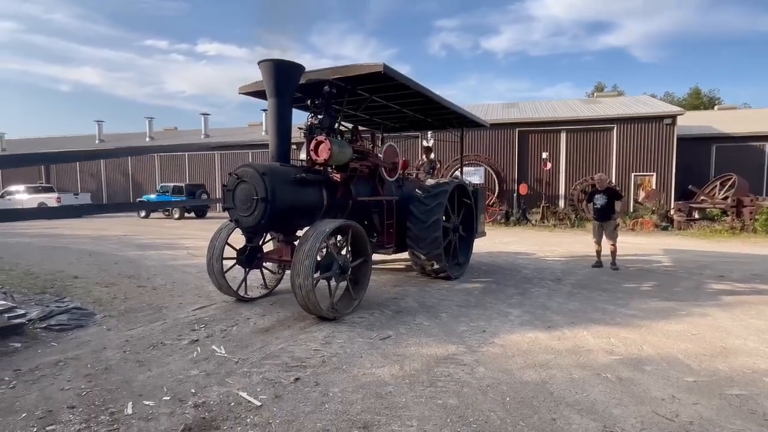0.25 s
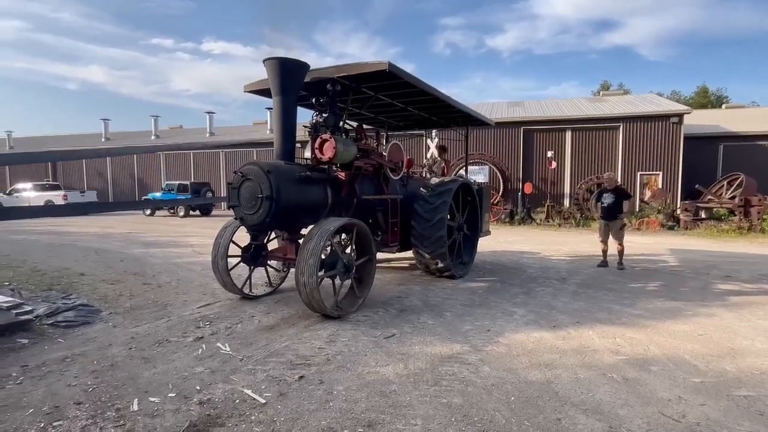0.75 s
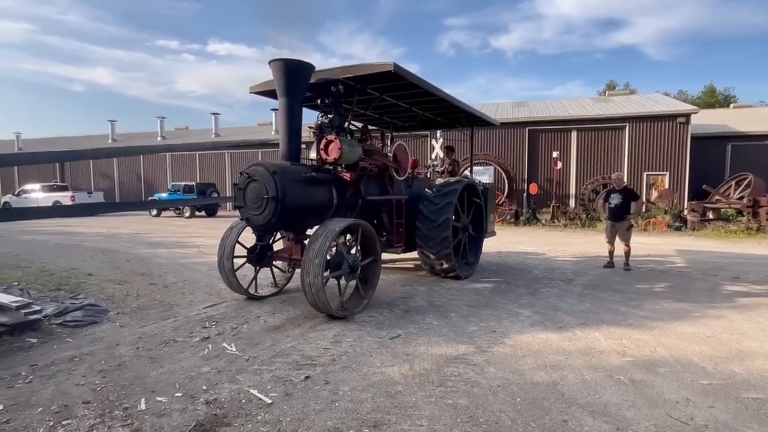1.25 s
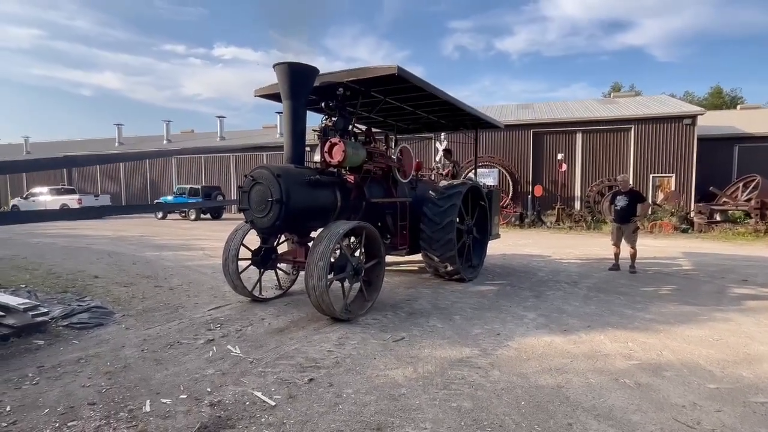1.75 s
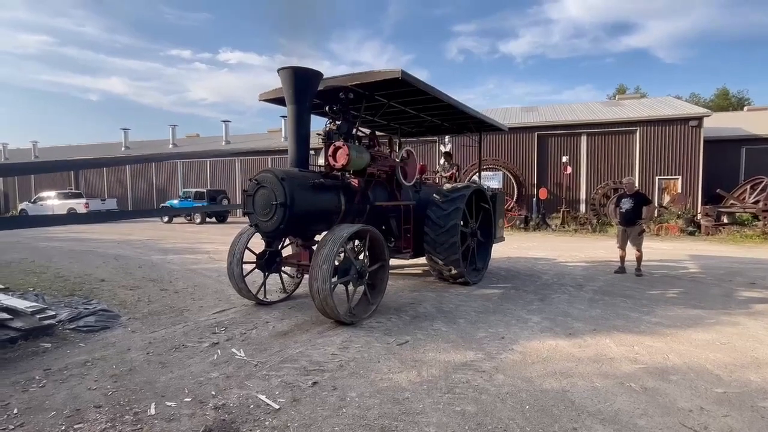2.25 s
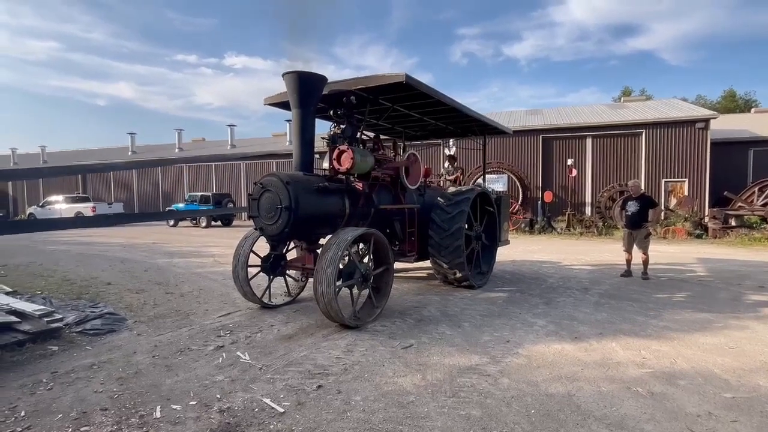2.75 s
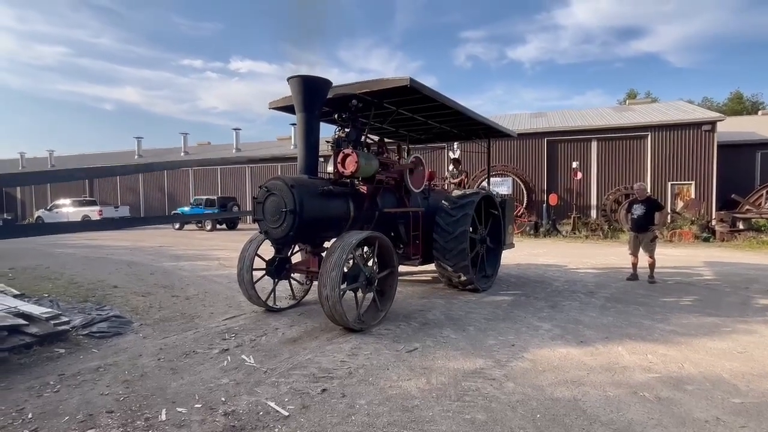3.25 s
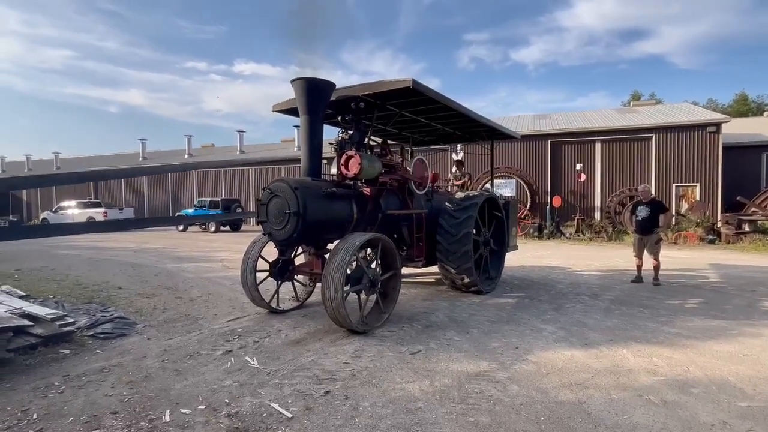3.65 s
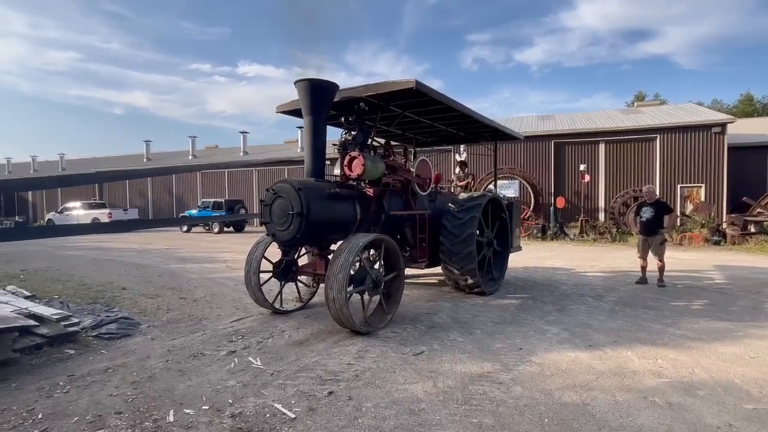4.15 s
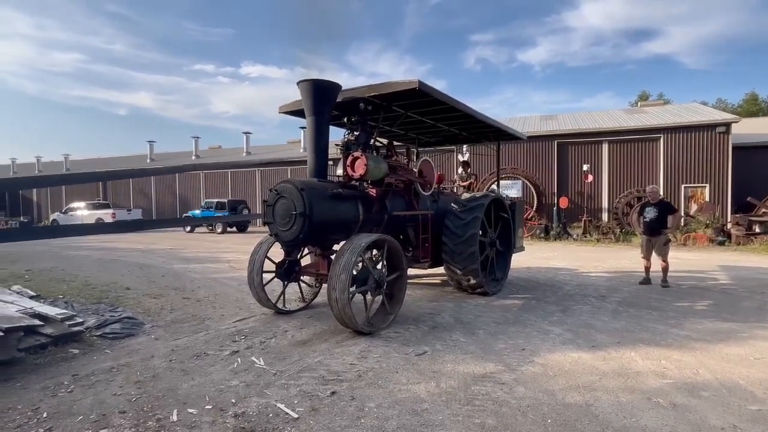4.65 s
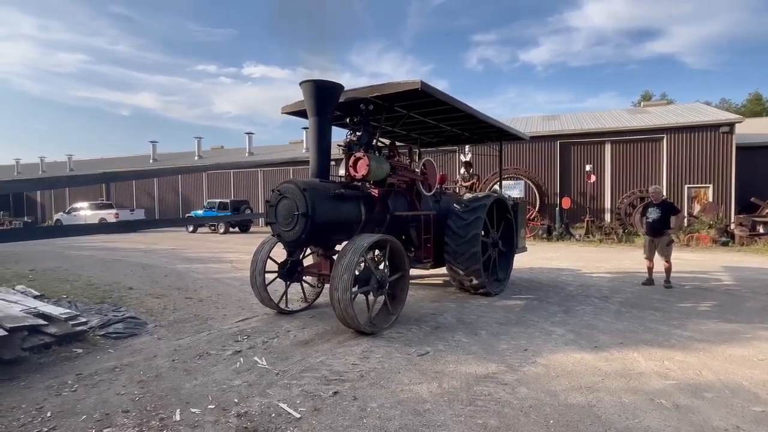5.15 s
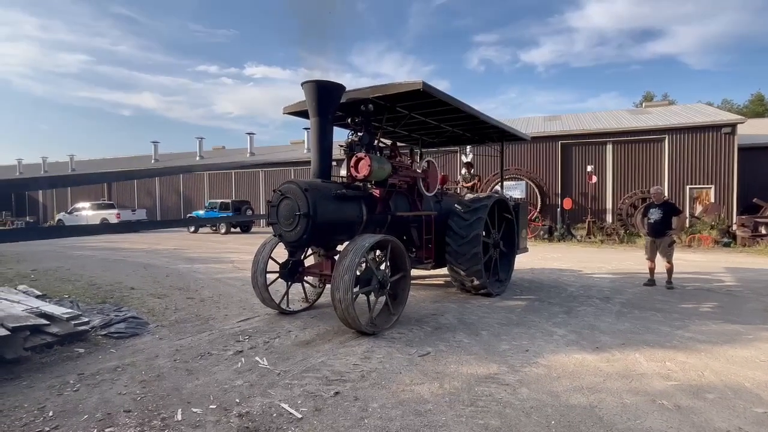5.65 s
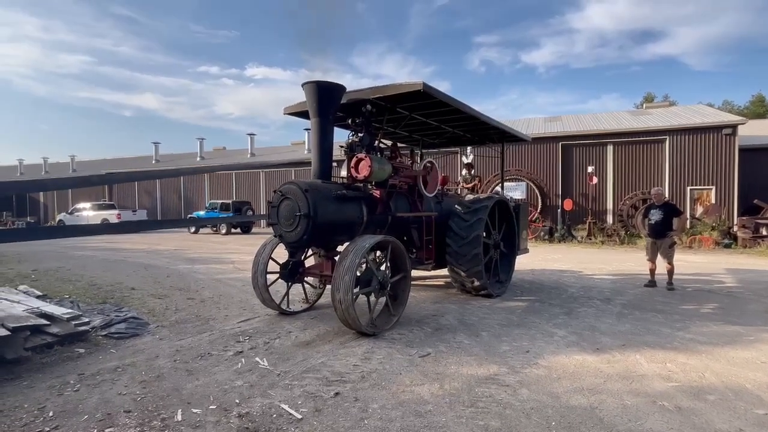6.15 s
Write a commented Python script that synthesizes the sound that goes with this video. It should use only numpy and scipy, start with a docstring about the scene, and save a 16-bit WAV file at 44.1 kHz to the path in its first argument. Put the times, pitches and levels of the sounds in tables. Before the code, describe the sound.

In an open gravel yard beside long sheds, a steam traction engine works under constant load. Quick, hollow chuffs bark from its chimney about eight times a second, each with a low thump, breathy roar and hiss. Softer puffs fall after every second beat. Fine metallic pings and rod clatter run underneath, with a continuous low fan rumble and faint steam leak. Stereo microphone at moderate distance, short shed reflections.

```python
"""Steam traction engine in a walled yard

The engine works under steady load. Twice a turn the exhaust blows up the chimney: a push rings the air in
smokebox and chimney as decaying modes, and a jet of shaped noise barks in the pipe, roars, hisses and spits.
A weaker puff of noise follows every second beat. The valve gear pings and the rods clatter as short sines,
over a grain of small pings; the driven fan and leaking steam rush on as noise without pause, and the sheds
answer with a noise tail."""
import sys
import numpy as np
from scipy import signal
from scipy.fft import rfft, irfft, next_fast_len
from scipy.io import wavfile
from scipy.ndimage import uniform_filter1d

SR = 44100
rng = np.random.default_rng(int(sys.argv[2]) if len(sys.argv) > 2 else 0)


def int16_out(signal):
    """Quantize to a 16-bit WAV file."""
    q = np.round(np.clip(np.atleast_2d(signal).T, -1, 1) * 32767)
    wavfile.write(sys.argv[1], SR, q.astype(np.int16))


N = 283122

# Exhaust beats: t/s, bark/dB, bark tilt/dB per octave, thump/dB, roar/dB
EXHAUST_BEATS = [(0.0528, -17, -6, -22, -23.5), (0.1896, -20, 28.5, -20, -26),
                 (0.3114, -12.5, -10, -24, -23.5), (0.4501, -16, -4, -15.5, -24),
                 (0.574, -15.5, 6, -18, -25), (0.7132, -22, 15, -15, -23), (0.837, -14.5, -12, -19, -22.0),
                 (0.9756, -12.5, 7.5, -16.5, -24.5), (1.098, -15.5, 9, -15, -25),
                 (1.2391, -16.5, 14.5, -17.5, -23.5), (1.361, -14, -12, -20, -26.5),
                 (1.5, -15.5, -6.5, -18, -25.5), (1.621, -15, 10, -17, -23), (1.764, -17, -4, -20, -26),
                 (1.8879, -16, -17, -18.5, -23), (2.0265, -15.5, -19, -15.5, -25.5),
                 (2.1505, -14.5, 13, -19.5, -25), (2.2886, -12.5, 2, -19, -23),
                 (2.4078, -15, -16, -20.5, -22.5), (2.549, -16, 5, -16, -24),
                 (2.675, -15.5, -9, -19, -24.0), (2.812, -18.5, -12, -16.5, -24.5),
                 (2.9341, -14.5, 1, -15.5, -23.5), (3.073, -17, 16, -21, -24.5),
                 (3.1971, -12.5, -5, -21, -25.5), (3.3325, -13, -1.5, -15, -26),
                 (3.4576, -21.5, -13, -19, -26), (3.597, -13.5, 8, -23, -22.5), (3.72, -16.5, 11, -20, -28),
                 (3.8575, -12.5, 1, -23.5, -24.5), (3.9823, -14.5, -20, -21, -24.5),
                 (4.1169, -20, 4, -15.5, -24), (4.2398, -16, -13, -16, -26.5),
                 (4.3796, -13, -3, -19, -23.5), (4.502, -21.5, 12, -16.5, -25.5),
                 (4.6408, -18, -8, -15, -23.5), (4.7634, -17, 10, -32, -24.5),
                 (4.9029, -17.5, 12, -19, -22.5), (5.026, -17, 14, -13.5, -23.5),
                 (5.1615, -13.5, -7, -21.5, -24), (5.284, -15, -13, -19, -24.0),
                 (5.422, -16.5, -20, -28, -25.0), (5.546, -17.5, -10, -21, -27.5),
                 (5.6832, -14.5, -8, -15, -24.0), (5.8006, -15.5, -2, -23, -26.5),
                 (5.9415, -14.5, -2, -25, -24), (6.06, -12, -5, -21.5, -23.5), (6.197, -18, -4, -27, -25.5),
                 (6.3221, -16.5, -3, -17.5, -24)]
# How long after its start each beat's bark swings widest: t/s
BARK_CRESTS = [0.0048, 0.006, 0.0071, -0.0018, 0.0039, 0.0038, 0.0099, 0.007, 0.0077, 0.0003, 0.015, 0.0042,
               0.0135, 0.013, 0.022, 0.0091, 0.013, 0.016, 0.021, 0.0069, 0.026, -0.00076, 0.011, 0.01,
               0.0055, 0.014, 0.0079, 0.0155, 0.0042, 0.0108, 0.0054, 0.017, 0.0187, 0.0118, 0.0149,
               -0.0049, 0.0135, -0.0011, 0.0036, 0.0007, 0.02, 0.0082, 0.005, 0.0225, 0.0233, 0.0045, 0.015,
               0.006, 0.016]
# The two ends of the cylinder take turns: swell stretch/factor, hiss/dB before scatter and sag
CYLINDER_ENDS = [(1.07, -35), (1.07, -33.5)]
# The weaker puff after every second beat: t/s, roar/dB, thud/dB
LATE_PUFFS = [(0.236, -32.5, -29), (0.498, -29, -28.8), (0.761, -31, -25), (1.018, -32, -34),
              (1.286, -30, -23), (1.561, -30, -31), (1.812, -29.5, -24), (2.071, -30, -32),
              (2.342, -29.5, -21.5), (2.599, -29, -30), (2.856, -29.5, -37), (3.125, -30, -22.5),
              (3.382, -29, -25), (3.646, -29.0, -26.5), (3.906, -29, -34), (4.165, -29.8, -32),
              (4.426, -32, -29.2), (4.69, -28.5, -29.0), (4.951, -30, -30), (5.21, -29, -27),
              (5.473, -29, -38), (5.731, -31.1, -26.8), (5.989, -29.5, -33), (6.25, -29, -27)]

# Air modes of the smokebox, rung by the push: f/Hz, level/dB, swell/s, phase scatter/rad
SMOKEBOX_MODES = [(59.9, -15, 0.037, 0.22), (68.6, -8, 0.013, 0.17), (84, 0, 0.011, 0.25),
                  (100, -10, 0.015, 0.54)]
# Air modes of the chimney, rung by the push: f/Hz, level/dB, swell/s, phase scatter/rad
CHIMNEY_MODES = [(172.2, 0.5, 0.021, 0.74), (200.2, -0.5, 0.016, 0.55), (252.8, -0.5, 0.018, 0.56),
                 (362.7, -11, 0.019, 0.68), (434, -25.5, 0.032, 1.5)]
# Low pipe resonances under the jet: f/Hz, width/Hz, relative level/dB
PIPE_RESONANCES = [(175, 61.6, 1), (276.4, 40.3, 1.5), (355, 45.2, -6), (414.4, 99.3, -7)]
# Upper resonances that colour the roar: f/Hz, width/Hz, relative level/dB
ROAR_RESONANCES = [(582, 82, -5), (688.3, 46, 4.5), (853, 76, 0), (1007, 62, 0.5), (1157, 86, 0.5),
                   (1364, 45, 2.5), (1520, 144, -1.5), (1730, 157, -2.5), (1892, 276, -7)]

# Colour of the hissing jet: f/Hz, relative level/dB per Hz
HISS_COLOUR = [(1500, -45), (2000, -8), (2400, 7.5), (3100, 6.5), (3600, 4), (4500, 5), (5300, 3),
               (6500, -3), (8000, -9), (11500, -37)]
# Colour of the wet crack at the nozzle: f/Hz, relative level/dB per Hz
SPIT_COLOUR = [(4500, -30), (6500, 6), (8500, -1), (11200, -2), (11700, -30)]
# Random patches of gain in the noise, none in the bass, even above 1500 Hz: f/Hz, depth/dB
PATCH_DEPTH = [(150, 0), (600, 2.6), (1500, 3), (2500, 3), (9000, 3)]

# The clearest pings of the valve gear: t/s, f/Hz, level/dB
CLEAR_PINGS = [(.418, 5920, -29), (.621, 5900, -29), (.679, 5840, -30), (.765, 3420, -25),
               (.918, 3090, -21.5), (1.155, 5900, -28), (1.371, 3160, -24.5), (2.554, 5070, -32),
               (3.86, 5530, -31), (4.011, 4400, -37), (4.640, 2160, -21), (6.171, 3200, -32)]

# Colour of the steady rush: f/Hz, relative level/dB per Hz
RUSH_COLOUR = [(22, -14.5), (36, -13.5), (46, -7), (58, 0.5), (75, -5.5), (95, -5), (130, -8.5),
               (260, -8.5), (500, -22.5), (750, -26), (1000, -27.5), (1600, -27), (2000, -31.5),
               (2300, -36.5), (2700, -34), (3200, -37.5), (4500, -36), (5300, -42), (6600, -42),
               (7600, -52.5), (11700, -77)]
# Loudness of the rush over time: t/s, level/dB
RUSH_LEVEL = [(0, -20.5), (1.6, -22.5), (3.2, -22.5), (4.8, -22.5), (6.42, -22.5)]
# Colour of a thin leak of steam: f/Hz, relative level/dB per Hz
LEAK_COLOUR = [(6500, -26), (7600, 0.5), (9800, 0), (10900, -4.5), (11300, -17), (11700, -33)]
# Loudness of the leak over time: t/s, level/dB
LEAK_LEVEL = [(0.0, -51.5), (0.41, -53), (1.98, -53.5), (2.68, -57), (3.86, -50.5), (4.42, -53),
              (4.59, -47.5), (4.9, -53.5), (5.67, -55), (6.42, -52)]

# Decay of the sheds' answer: f/Hz, t60/s
YARD_DECAY = [(60, 0.43), (300, 0.087), (1500, 0.079), (8000, 0.29)]
# Likeness of left and right: f/Hz, correlation/1
STEREO_LIKENESS = [(60, .998), (170, .94), (430, .8), (620, .4), (800, .6), (1100, .68), (1500, .58),
                   (1700, .3), (1980, .85), (2200, .6), (2400, .1), (3100, .42), (3500, .2), (4000, .42),
                   (4500, .35), (4900, .1), (5500, .55), (5950, .15), (6400, .78), (6850, .65), (7200, .15),
                   (7700, .28), (8700, .05), (9800, .52), (10500, .5), (11000, .22), (11500, .7)]
# Colour difference between left and right: f/Hz, left over right/dB
STEREO_LEAN = [(40, -0.5), (150, -0.5), (300, 2), (600, 2.5), (1200, 0.5), (1600, -1), (2500, -2),
               (4200, 0), (6800, -0.5), (7050, -4.5), (9400, -5), (10000, -2), (11500, -.5)]
# Phase between left and right: f/Hz, left lead/rad
STEREO_PHASE = [(110, 0), (170, .5), (420, .66), (550, 1), (750, .6), (900, 1.1), (1100, 1.6), (1550, 1.75),
                (1850, 2.8), (2250, 3.3), (2600, 6.7), (3250, 8.3), (3750, 6.3), (4350, 5.3), (4750, 6),
                (5050, 9.4), (5750, 9.4), (6100, 12.6), (6850, 12.6), (7600, 15.7), (7900, 15.8),
                (8600, 17.6), (9350, 22), (10500, 22), (11300, 18.9)]

USUAL_CREST_S, CREST_PULL = 0.011, 0.31  # a late crest drags the swell along by this share
PIPE_JET_DB, SPIT_DB = -4, -26  # jet in the low pipe over the bark, spit over the roar
RASP_HZ, RASP_DB = 220, 1  # the jet flutters as it tears out of the nozzle
HISS_SCATTER_DB, HISS_SAG_DB_PER_S = 0.6, 0.9  # varies from beat to beat; slowly weakens
LATE_HISS_DB, LATE_DULL_HZ = -4, 5530  # hiss of the late puff over its roar; it lacks the top
THUD_AFTER_S = 0.022  # the low pipe answers the late puff
PING_ROUGH_RAD = 0.08  # wander of a ping's phase per sample
CLATTER_DB, CLATTER_SPREAD_DB, CLATTER_RING_S = -36.5, 1.5, 0.008
YARD_DB, YARD_DELAY_SAMPLES = -14.5, 1100
TOP_HZ = 11750  # band limit


def amp(db):
    """Decibels to amplitude."""
    return 10 ** (np.asarray(db) / 20)


def unit(x):
    """Scale to an rms of 1."""
    return x / np.sqrt(np.mean(x ** 2) + 1e-20)


def along(points, hz):
    """Read a curve of (f/Hz, value) points on a log frequency axis."""
    f, value = np.transpose(points)
    return np.interp(np.log(hz + 1), np.log(f + 1), value)


def colour(points):
    """Turn a curve of (f/Hz, level/dB) points into an amplitude response."""
    return lambda hz: amp(along(points, hz))


def filtered(x, response):
    """Shape the spectrum of x by a complex response of frequency."""
    size = next_fast_len(N + SR // 2)
    hz = np.fft.rfftfreq(size, 1 / SR)
    return irfft(rfft(x, size) * response(hz), size)[..., :N]


def resonances(modes):
    """Sum a row of band-pass resonances with alternating signs."""
    def response(f):
        total = 0
        for k, (centre, width, db) in enumerate(modes):
            damping = 1j * f * width
            total = total + (-1) ** k * amp(db) * damping / (centre ** 2 - f ** 2 + damping)
        return total
    return response


def noise(response):
    """Two partly alike noises of joint rms 1, with random patches of gain."""
    hz, _, cells = signal.stft(rng.standard_normal((2, N)), SR, nperseg=512)
    field = rng.standard_normal(cells.shape[1:])
    field = uniform_filter1d(uniform_filter1d(field, size=4, axis=0), size=4, axis=1)
    patches = amp(along(PATCH_DEPTH, hz)[:, None] * unit(field))
    pair = signal.istft(cells * patches, nperseg=512)[1][:, :N]

    def mid_side(hz):
        angle = np.arccos(np.clip(along(STEREO_LIKENESS, hz), -1, 1)) / 2
        return response(hz) * [np.cos(angle), np.sin(angle)]

    mid, side = filtered(pair, mid_side)
    return unit(np.array([mid + side, mid - side]))


def puffs(times, levels_db, rise, fall):
    """Steam flow: each puff rises and dies away, with its peak at the given level."""
    flow, t = np.zeros(N + SR), np.arange(SR // 2) / SR
    shape = (1 - np.exp(-t / rise)) ** 2 * np.exp(-t / fall)
    shape = shape / shape.max()
    for when, db in zip(times, levels_db):
        flow[max(round(when * SR), 0):][:len(t)] += amp(db) * shape
    return flow[:N]


def rings(times, crests, levels_db, tilts_db, modes, stretches, order, lead=0.0069):
    """Each push swells all air modes; their swings fall roughly in step at the crest of the beat."""
    out, t = np.zeros(N + SR), np.arange(SR // 4) / SR
    for when, crest, db, tilt_db, stretch in zip(times, crests, levels_db, tilts_db, stretches):
        start = round((when - lead) * SR)
        for hz, mode_db, swell, scatter in modes:
            size, slip = scatter * rng.standard_normal(2)
            swing = np.cos(2 * np.pi * hz * (t - lead - crest) + slip)
            u = t / (swell * stretch)
            envelope = (u * np.exp(1 - u)) ** order
            colour_db = tilt_db * np.log2(min(hz, 260) / 205)  # upward tilt favours the upper modes
            out[start:][:len(t)] += amp(db + mode_db + colour_db + 1.3 * size) * envelope * swing
    return out[:N]


def push(s, drag, bark_db, tilt_db, thump_db, stretches):
    """The push of each beat rings the smokebox as a thump and the chimney as a bark."""
    thump = rings(s + 0.0012, 0 * s, thump_db, 0 * s, SMOKEBOX_MODES, stretches, order=1)
    thump = filtered(thump, lambda hz: 1 - 1 / (1 + (hz / 52) ** 10))  # low cut below the modes
    crests = np.array(BARK_CRESTS) - drag
    return thump + rings(s + drag, crests, bark_db, tilt_db, CHIMNEY_MODES, stretches, order=3)


def pipe_jet(s, bark_db, late, thud_db):
    """Steam noise excites the low pipe: under each bark, and as a thud after each late puff."""
    bark = puffs(s - 0.008, bark_db + PIPE_JET_DB, rise=0.013, fall=0.021)
    thud = puffs(late + THUD_AFTER_S, thud_db, rise=0.013, fall=0.012)
    bright_pipe = lambda hz: resonances(PIPE_RESONANCES)(hz) * (hz / 200) ** 1.106
    return bark * noise(resonances(PIPE_RESONANCES)) + thud * noise(bright_pipe)


def roar(s, drag, roar_db, late, late_roar_db):
    """Fluttering steam flow roars through the upper resonances."""
    flow = puffs(s - 0.013 + 0.25 * drag, roar_db, rise=0.023, fall=0.019)
    flow = flow + puffs(late, late_roar_db, rise=0.014, fall=0.02)
    flutter = filtered(rng.standard_normal(N), lambda hz: (hz > 20) / (1 + (hz / RASP_HZ) ** 2))
    rasp = unit(amp(RASP_DB * unit(flutter)))
    return rasp * flow * noise(resonances(ROAR_RESONANCES))


def hiss(s, hiss_db, late, late_roar_db):
    """The jet's turbulence hisses in the treble; the late puffs hiss more dully."""
    beat_db = hiss_db + HISS_SCATTER_DB * rng.standard_normal(len(s)) - HISS_SAG_DB_PER_S * s
    late_db = late_roar_db + LATE_HISS_DB - HISS_SAG_DB_PER_S * late
    beat_flow = puffs(s - 0.02, beat_db, rise=0.057, fall=0.028)
    late_flow = puffs(late, late_db, rise=0.019, fall=0.024)
    dull = lambda hz: colour(HISS_COLOUR)(hz) / (1 + (hz / LATE_DULL_HZ) ** 2)
    return beat_flow * noise(colour(HISS_COLOUR)) + late_flow * noise(dull)


def spit(s, roar_db):
    """Short bursts of high noise give the wet crack at the nozzle."""
    flow = puffs(s - 0.022, roar_db + SPIT_DB, rise=0.021, fall=0.011)
    return flow * noise(colour(SPIT_COLOUR))


def exhaust():
    """Rung air modes and steam noise share the timing of the beats and late puffs."""
    s, bark_db, tilt_db, thump_db, roar_db = np.transpose(EXHAUST_BEATS)
    late, late_roar_db, thud_db = np.transpose(LATE_PUFFS)
    stretches, hiss_db = np.resize(CYLINDER_ENDS, (len(s), 2)).T
    drag = CREST_PULL * (np.array(BARK_CRESTS) - USUAL_CREST_S)
    beat = push(s, drag, bark_db, tilt_db, thump_db, stretches) + pipe_jet(s, bark_db, late, thud_db)
    steam = roar(s, drag, roar_db, late, late_roar_db) + hiss(s, hiss_db, late, late_roar_db)
    return beat + steam + spit(s, roar_db)


def pings(count=500):
    """Random brief high pings, rough in phase, make a fine grain; a few listed ones stand out."""
    draw = rng.random((count, 3))
    times, pitches = draw[:, 0] * N / SR, 2200 * 2.9 ** draw[:, 1]
    grain = np.c_[times, pitches, -44 - 2 * np.log(draw[:, 2])]
    out, t = np.zeros(N + SR), np.arange(SR // 20) / SR
    envelope = (1 - np.exp(-t / 0.003)) * np.exp(-t / 0.011)
    for when, hz, db in [*CLEAR_PINGS, *grain]:
        wander = np.cumsum(rng.normal(0, PING_ROUGH_RAD, len(t)))
        out[round(when * SR):][:len(t)] += amp(db) * envelope * np.sin(2 * np.pi * hz * t + wander)
    return out[:N]


def clatter(count=400):
    """Gears and rods knock dully at random moments, each a short decaying sine."""
    draw = rng.random((count, 3))
    out, t = np.zeros(N + SR), np.arange(SR // 20) / SR
    envelope = (1 - np.exp(-t / 0.0035)) * np.exp(-t / CLATTER_RING_S)
    for when, pitch, size in draw:
        db = CLATTER_DB - CLATTER_SPREAD_DB * np.log(size) - 9 * pitch  # the higher, the weaker
        hz = 300 * 6.5 ** pitch
        out[round(when * N):][:len(t)] += amp(db) * envelope * np.sin(2 * np.pi * hz * t)
    return out[:N]


def rush():
    """The fan's rumble and the leaking steam: unbroken noises that follow slow level curves."""
    t = np.arange(N) / SR
    level = lambda curve: amp(np.interp(t, *np.transpose(curve)))
    fan_and_steam = level(RUSH_LEVEL) * noise(colour(RUSH_COLOUR))
    return fan_and_steam + level(LEAK_LEVEL) * noise(colour(LEAK_COLOUR))


def yard(x):
    """The sheds answer with a delayed noise tail; each frequency dies at its own speed."""
    hz, t, cells = signal.stft(rng.standard_normal((2, SR // 2)), SR, nperseg=256)
    alike = along(STEREO_LIKENESS, hz)[:, None]
    cells[1] = alike * cells[0] + np.sqrt(np.clip(1 - alike ** 2, 0, 1)) * cells[1]
    decay = amp(-60 * t / along(YARD_DECAY, hz)[:, None])
    tail = signal.istft(cells * decay, SR, nperseg=256)[1]
    tail = tail / np.linalg.norm(tail[0])
    delayed = np.pad(x, ((0, 0), (YARD_DELAY_SAMPLES, 0)))
    return signal.fftconvolve(delayed, tail, axes=1)[:, :N]


def scene():
    """The engine's beats and mechanism echo in the yard; the rush is added without echo."""
    engine = exhaust() + pings() + clatter()
    return engine + amp(YARD_DB) * yard(engine) + rush()


def record(dry):
    """Left and right differ in phase and colour; peaks round off; nothing stays above the band limit."""
    side = np.array([[0.5], [-0.5]])  # left, right: half of each difference
    lean = lambda hz: amp(side * along(STEREO_LEAN, hz))
    turn = lambda hz: np.exp(1j * side * along(STEREO_PHASE, hz))
    heard = filtered(dry, lambda hz: lean(hz) * turn(hz))
    rounded = heard / (1 + np.abs(heard) ** 14) ** (1 / 14)
    return filtered(rounded, lambda hz: hz < TOP_HZ)


dry = scene()
out = record(dry)
int16_out(out)
```